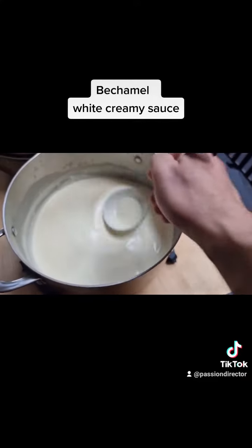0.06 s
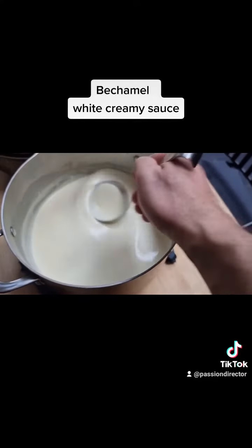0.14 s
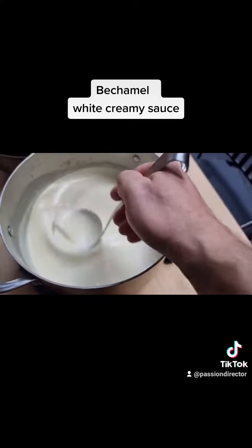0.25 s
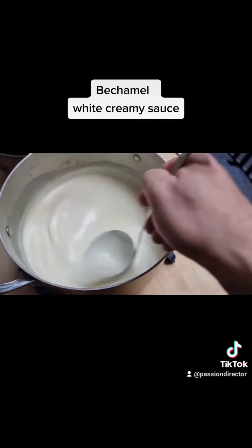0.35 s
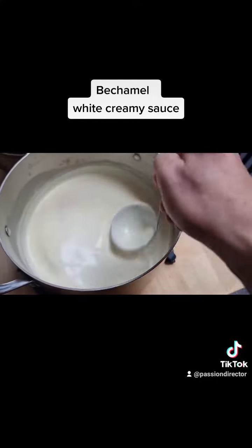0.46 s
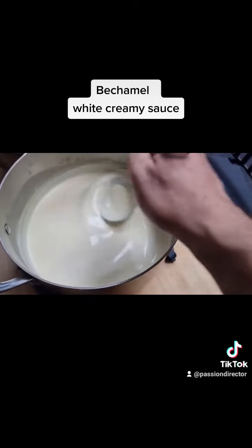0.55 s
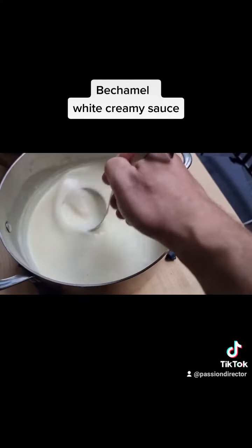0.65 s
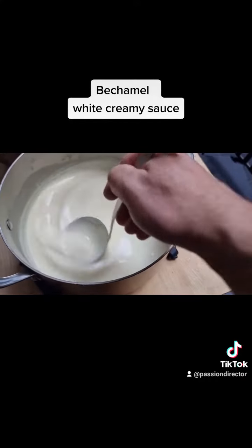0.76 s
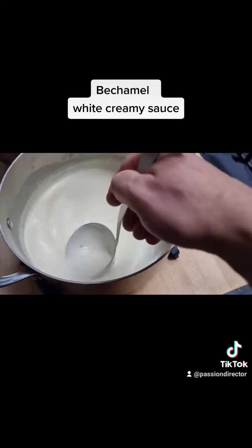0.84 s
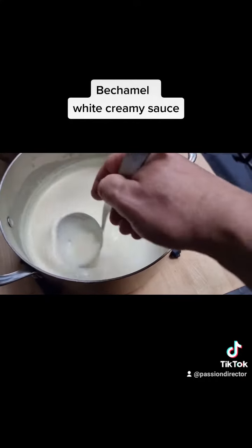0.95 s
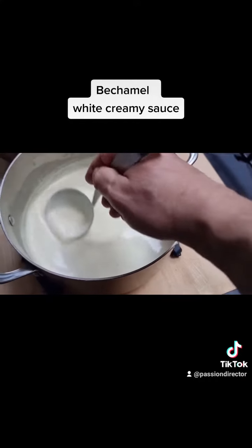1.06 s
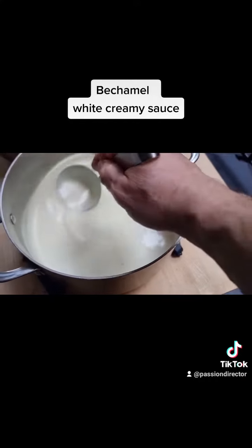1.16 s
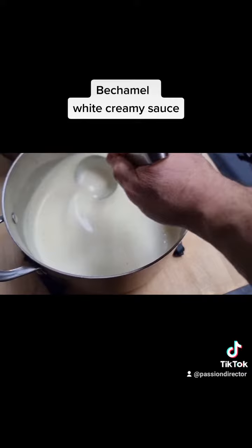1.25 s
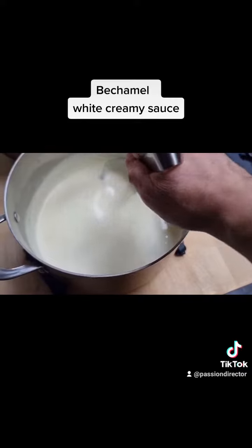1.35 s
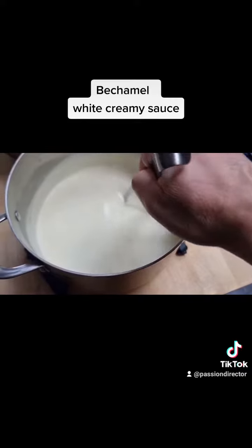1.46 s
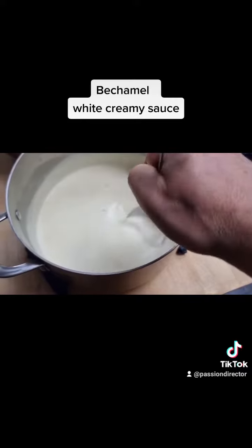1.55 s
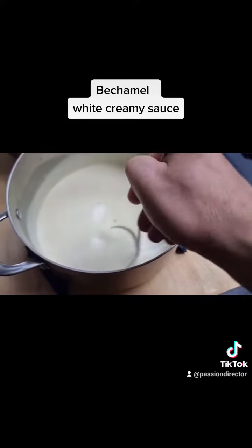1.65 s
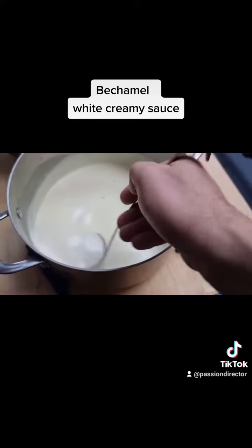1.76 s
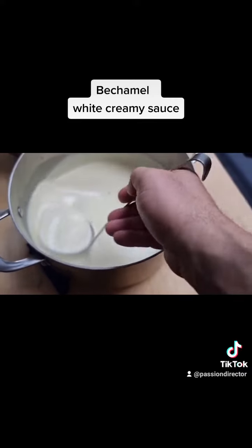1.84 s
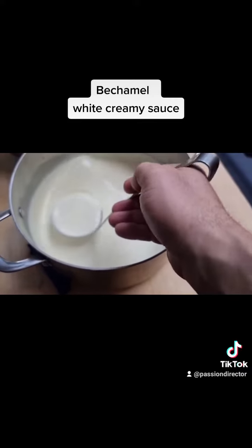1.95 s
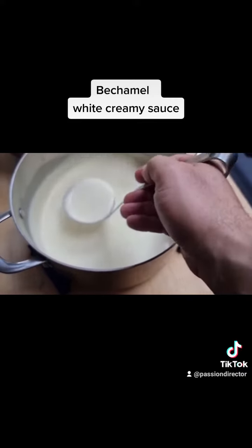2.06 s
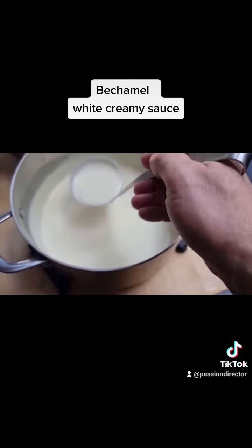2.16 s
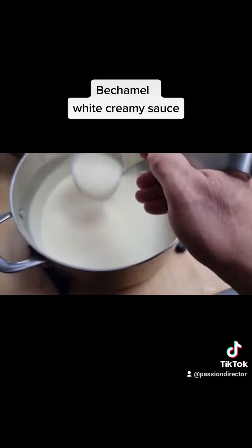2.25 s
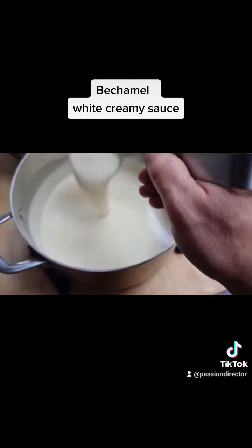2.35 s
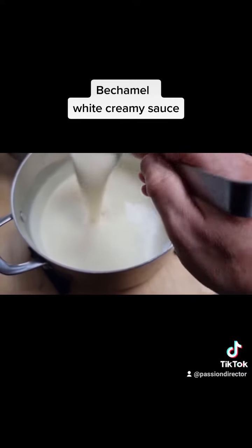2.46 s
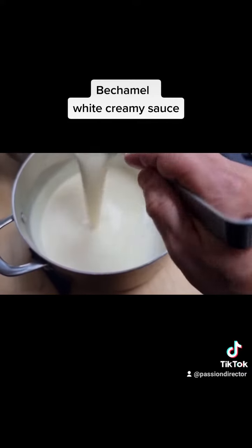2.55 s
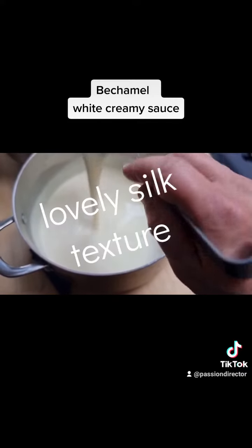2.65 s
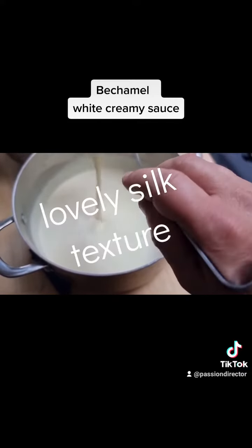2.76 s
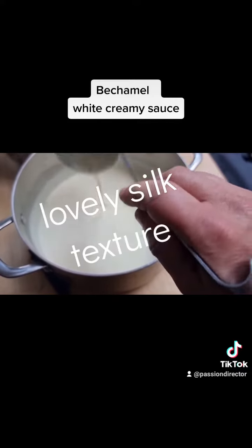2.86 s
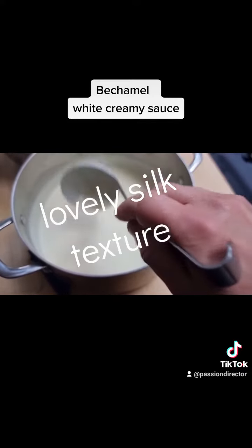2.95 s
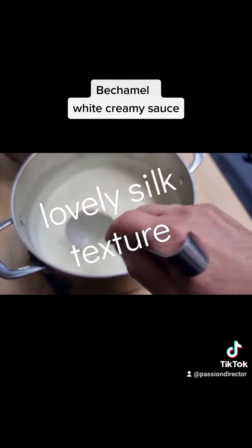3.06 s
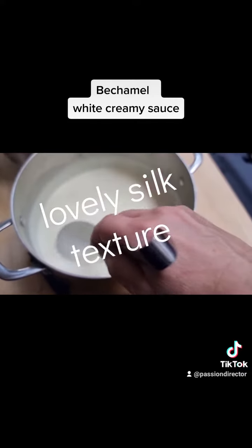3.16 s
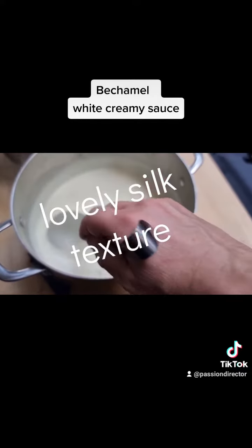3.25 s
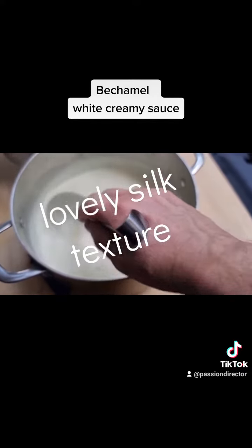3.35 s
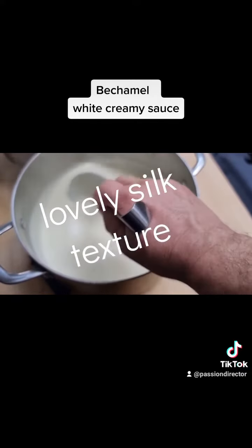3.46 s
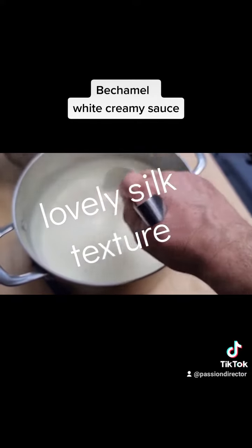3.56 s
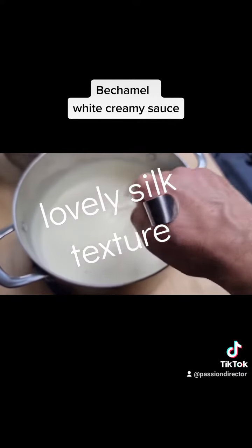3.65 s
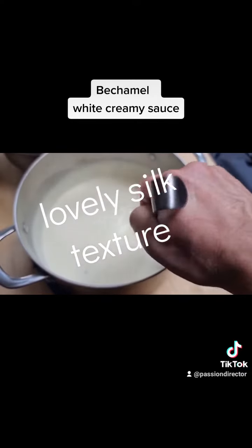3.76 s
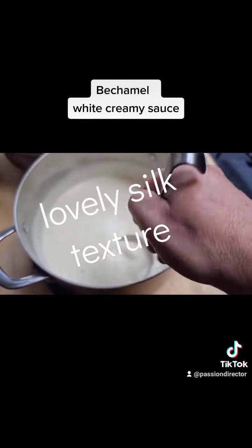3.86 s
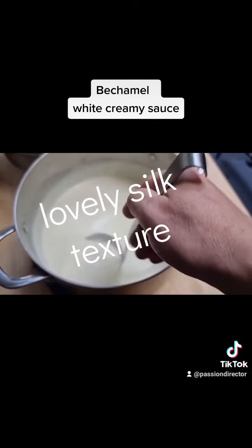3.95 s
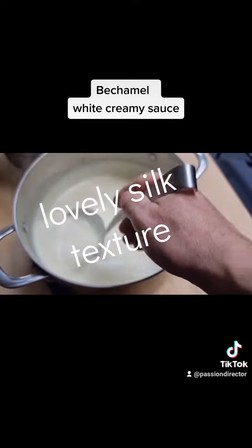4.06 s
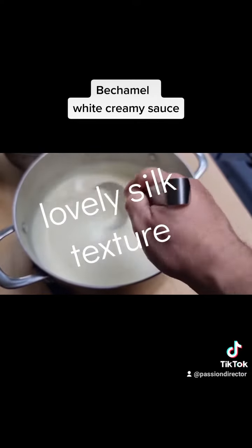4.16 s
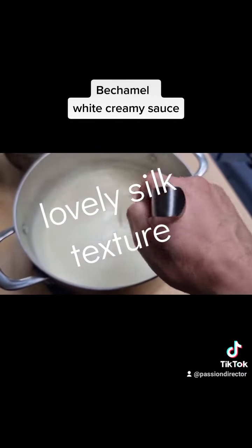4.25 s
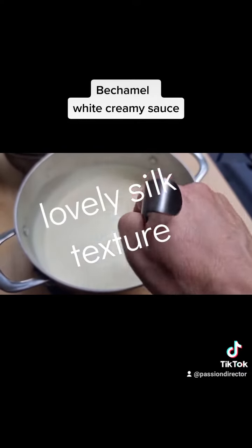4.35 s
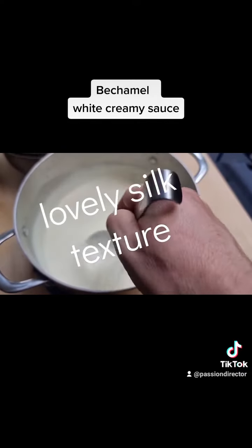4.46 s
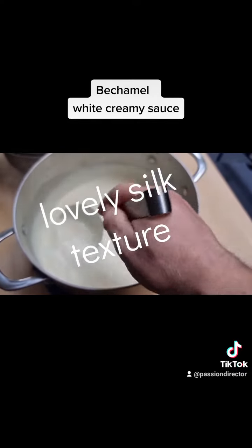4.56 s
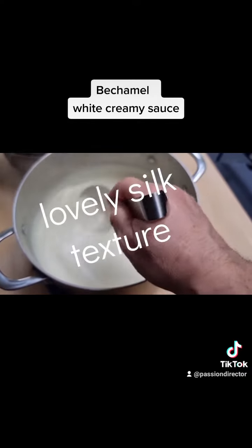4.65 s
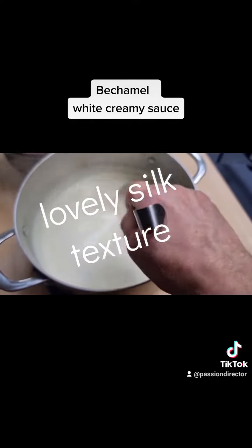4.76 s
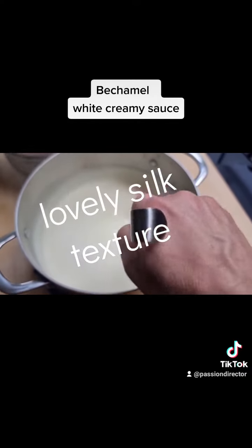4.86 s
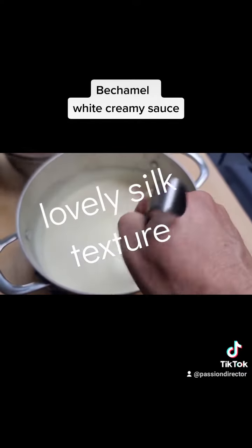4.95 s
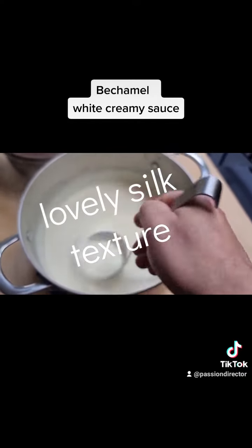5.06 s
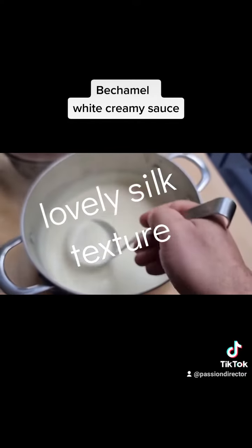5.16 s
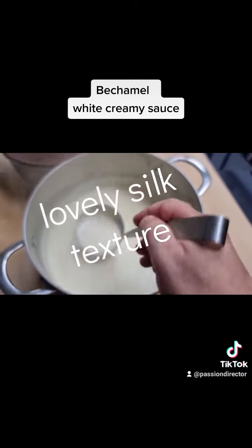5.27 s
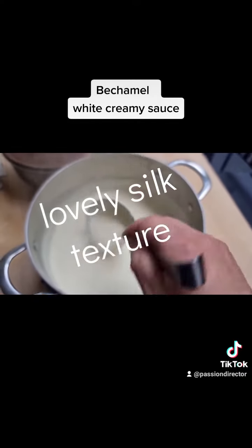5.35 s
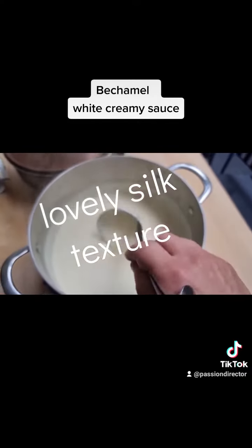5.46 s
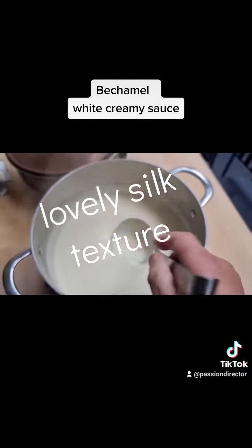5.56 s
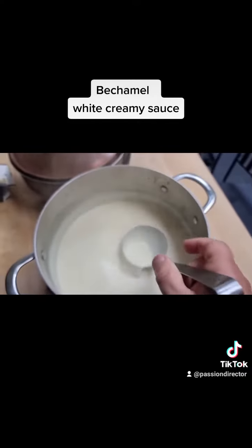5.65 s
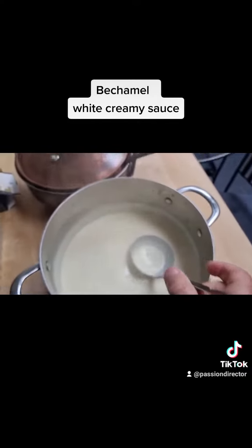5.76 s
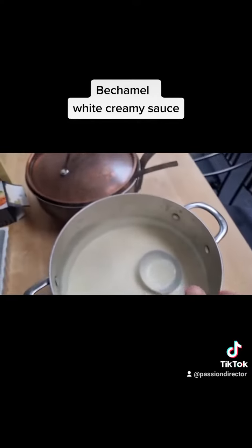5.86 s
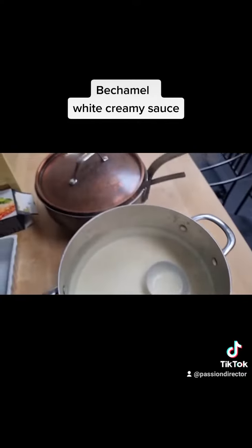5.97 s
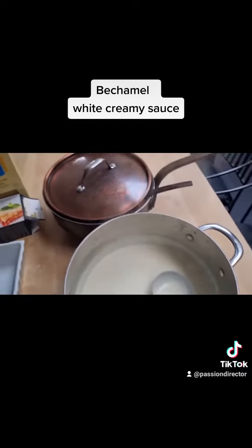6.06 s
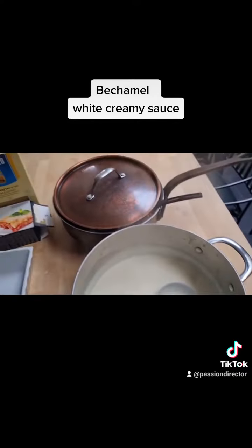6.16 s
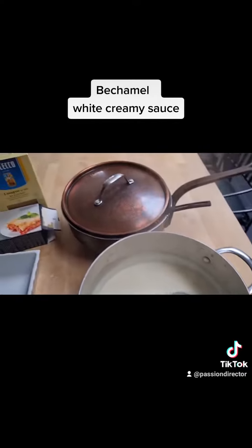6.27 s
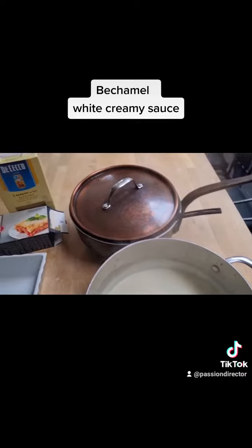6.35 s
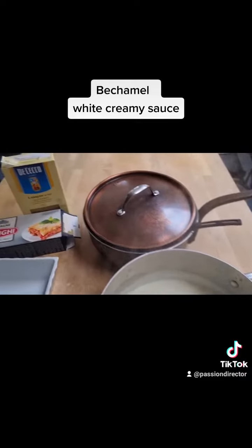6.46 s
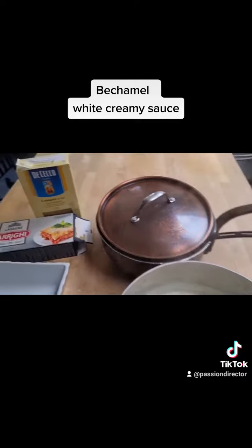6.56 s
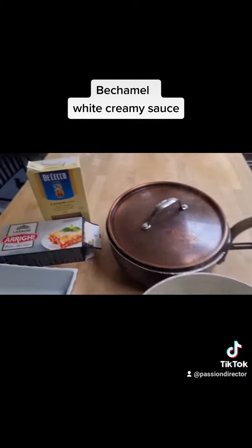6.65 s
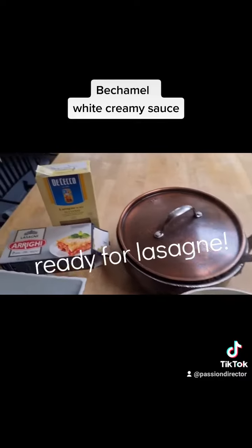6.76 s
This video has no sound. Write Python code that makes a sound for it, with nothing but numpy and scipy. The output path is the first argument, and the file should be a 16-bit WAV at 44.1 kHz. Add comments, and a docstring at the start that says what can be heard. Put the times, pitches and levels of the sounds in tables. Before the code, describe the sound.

A metal ladle scrapes unevenly around a steel pot of thick sauce in two spells, with small ticks and bumps. Between them, sauce plops quietly and the ladle knocks the bottom. Near the end it drops on the rim with a sharp clank, followed by a light rasping slide. The pot is close, in a kitchen with a brief echo and a faint fan and fridge hum.

```python
"""In a small kitchen, a steel ladle stirs thick sauce in a steel pot. Its bowl scrapes and bumps
the bottom, which sets the damped pot ringing. Ladle and sauce tick, and poured sauce plops.
The ladle knocks the bottom, then drops on the rim, and its handle rattles and slides along it.
The room echoes briefly, a fridge hums and a fan rushes far off."""
import sys
import numpy as np
from scipy import signal
from scipy.fft import rfft, irfft, next_fast_len
from scipy.io import wavfile
from scipy.ndimage import uniform_filter1d

SR = 44100
rng = np.random.default_rng(int(sys.argv[2]) if len(sys.argv) > 2 else 0)


def unload_wav(signal):
    """Save mono or channel-first audio to the path in sys.argv[1] as 16-bit WAV at rate SR, clipped to [-1, 1]."""
    wavfile.write(
        sys.argv[1],
        SR,
        np.round(np.clip(np.atleast_2d(signal).T, -1, 1) * 32767).astype(np.int16),
    )


N = 300321
TOP_HZ = 16000

# Two spells of stirring. Each row: time in seconds, level in dB, extra dB for the low tones,
# the low and the upper pitch in Hz that the ladle excites most, extra dB for the treble.
STIRRING = [
    [(0.0, -43, -0.5, 604, 1770, -30), (0.078, -49, -0.5, 540, 1020, -24.5),
     (0.164, -48.5, -6, 600, 950, -26.5), (0.38, -43, -1.5, 446, 1330, -23),
     (0.518, -50.5, -3, 675, 1710, -25), (0.624, -48.5, -3, 583, 1190, -22.5),
     (0.728, -38.5, -6.5, 590, 1250, -24.5), (0.946, -61.5, 1, 415, 1270, -39),
     (1.036, -47, -2.5, 616, 1150, -36), (1.084, -47, -5, 650, 1610, -28.5),
     (1.38, -56, -9.5, 443, 1030, -22.5), (1.545, -49.5, -6.5, 517, 1040, -27),
     (1.56, -45, 0, 490, 1110, -56), (1.688, -45, -1.5, 625, 1120, -36), (1.724, -43.5, -1, 426, 1170, -27),
     (1.782, -57, -3, 560, 1150, -16.5), (1.9, -71, 3, 375, 1180, -30)],
    [(3.3, -60, -21, 518, 2400, -27.5), (3.408, -52, -8, 580, 2350, -21.5),
     (3.47, -48.5, -13, 559, 2310, -25.5), (3.582, -48, -38, 439, 2000, -18.5),
     (3.664, -52, -15, 540, 1310, -23), (3.778, -48.5, -3, 610, 1020, -29),
     (3.98, -42.5, -1, 410, 1200, -36.5), (4.22, -49, -5.5, 570, 1480, -16),
     (4.356, -50, -2, 467, 1060, -27), (4.598, -45.5, -4.5, 604, 1230, -29),
     (4.76, -47, -13.5, 544, 1630, -8), (4.876, -51, -19, 577, 1740, -23),
     (4.922, -51, -1.5, 504, 1050, -26), (5.082, -55, -3, 452, 1350, -27),
     (5.15, -73, -4, 401, 1145, -63.5)],
]
def stirring():
    """The ladle's bowl drags unevenly over the bottom: the pot rings and the steel hisses."""
    (level_db, low_db, low_hz, upper_hz, treble_db), active = curves(STIRRING)
    catches = amp(2.5 * np.array([wobble(40) for _ in range(4)]))
    *pushes, rubbing = amp(level_db) * active * catches  # one push for each group of pot tones
    return pot(pushes, low_db, low_hz, upper_hz) + scrape_hiss(rubbing, treble_db)


# The tones of the full pot. Each row: pitch in Hz, seconds to fade by 60 dB, group (0 low,
# 1 middle, 2 high), then level in dB when scraped, struck on the bottom and struck on the rim.
POT_TONES = [(282.5, 0.069, 0, 1, -28.5, -8.5), (308.8, 0.13, 0, 6.5, -10, -6),
             (382, 0.079, 0, 0.5, -23.5, -15), (484, 0.24, 0, 1.5, -31.5, -41.5),
             (526.6, 0.2, 0, -2, -32.5, -9), (581, 0.44, 0, -6.5, -15, -27), (658, 0.22, 0, 6, -39, 5.5),
             (736.4, 0.24, 0, 3.5, -31, -30.5), (895, 0.16, 1, -3, -17, -4), (1024, 0.14, 1, -8, 0.5, -1.5),
             (1066.4, 0.076, 1, -1.5, -23.5, 16), (1119, 0.091, 1, 1, -15, -34.5),
             (1197, 0.18, 1, -9, -1.5, -13), (1360, 0.061, 1, -3, 3.5, -17.5),
             (1530, 0.13, 2, -8.5, 6.5, -7), (1634, 0.1, 2, -2, -8.5, -8), (1850, 0.08, 2, 3.5, -17.5, 2),
             (2030, 0.079, 2, -1, 12, 1), (2170, 0.13, 2, -9.5, -2, -21), (2332, 0.033, 2, 3, -10, -20.5),
             (2704, 0.076, 2, -5, -11.5, -23)]
# Extra dB for the low, middle and high group when scraped.
GROUP_DB = [-5, -5, -8.5]
def pot(pushes, low_db, low_hz, upper_hz):
    """Scraping, bumps and blows all ring the same tones; the pressing ladle damps and detunes them."""
    out = np.zeros((2, N))
    end = round((STIRRING[-1][-1][0] + .25) * SR)
    for hz, t60, group, scraped_db, bottom_db, rim_db in POT_TONES:
        group = round(group)
        tone_db = scraped_db + GROUP_DB[group] + contact_db(hz, group, low_db, low_hz, upper_hz)
        pressure = amp(tone_db + 2.04 * wobble(7)) * pushes[group]
        scrape = steady(.6 * t60) * pressure[:end] * friction(rough_db=5.5, rate=140, size=end)
        phase = -rng.uniform(.5, 1.8) * min(hz / 700, 1)
        out[:, :end] += ring(bumps(hz, end), hz, .5 * t60, phase)
        out[:, :end] += ring(scrape, hz, .44 * t60, phase, drift_hz=.01 * hz * wobble(4, end))
        out += blows(hz, t60, bottom_db, rim_db)
    # A small pot gives off no bass, and the sauce softens the treble.
    return signal.sosfilt(signal.butter(4, [250, 3500], "band", fs=SR, output="sos"), out)


def contact_db(hz, group, low_db, low_hz, upper_hz):
    """Where the bowl touches decides which tones it excites: those farther off in pitch get less."""
    if group == 0:
        return low_db - 24 * np.abs(np.log(hz / low_hz))
    upper_db = 10 * np.log10(np.clip(1 - amp(2 * low_db), .08, 1))  # what the low tones leave
    off_octave = np.abs(np.log(hz / (2.015 * upper_hz))) + .15  # tones an octave up answer too
    away = np.minimum(np.abs(np.log(hz / upper_hz)), off_octave)
    return upper_db + 5 * np.exp(-(away / .099) ** 2) - 14.5 * away


# Light bumps on the bottom. Each row: start in seconds, level in dB, pitch in Hz that rings most.
BUMPS = [(0.028, -30, 682), (0.076, -29.5, 473), (0.11, -34, 1884), (0.293, -24, 1100), (0.357, -23.5, 471),
         (0.399, -36, 480), (0.72, -31, 652), (1.554, -35, 520), (1.644, -28.5, 386), (1.676, -35, 661),
         (1.705, -22, 391), (2.987, -20, 1041), (3.589, -34, 1860), (3.839, -37, 1070), (3.964, -28, 384.4),
         (4.1, -39.5, 657), (4.575, -24, 639)]
def bumps(hz, size, contact_s=.0051):
    """The pushes that bumps give one pot tone; the sauce cushions each into a smooth pulse."""
    contact = np.hanning(round(contact_s * SR) + 3)
    push = contact / contact.sum() * np.exp(2j * np.pi * hz * np.arange(len(contact)) / SR)
    force = np.zeros(size, complex)
    for start, db, main_hz in BUMPS:
        force[round(start * SR):][:len(push)] = push * amp(db - 510 * abs(np.log(hz / main_hz)))
    return force


# Blows of the ladle. Each row: start in seconds, pot level in dB, place (0 bottom, 1 rim),
# handle level in dB, click level in dB, how many dB louder the left side is.
BLOWS = [(3.1698, -26, 0.068, -49, -1, 3.5), (5.580, -22, 0.92, -40, 2.5, -1.5),
         (5.599, -27.5, 0.8, -55.5, -12.5, 6), (6.093, -63.5, 1, -40.5, -19.5, 4)]
def blows(hz, t60, bottom_db, rim_db):
    """One pot tone after each blow: it starts louder and drops fast while the ladle still touches."""
    out = np.zeros((2, N))
    t = np.arange(SR // 2) / SR
    shape = (1 + amp(-.5 - 60 * t / .03)) * (1 - np.exp(-t / .0009))
    for start, db, place, _, _, left_db in BLOWS:
        first = round(start * SR)
        size = min(len(t), N - first)
        force = np.zeros(size)
        force[0] = amp(db + bottom_db + place * (rim_db - bottom_db))
        damped_t60 = (.28 + .6 * place) * t60  # on the bottom the ladle stays down and damps the ring
        phase = np.sign(left_db) * rng.uniform(.8, 1.9) * min(hz / 900, 1)  # the louder side leads
        tone = ring(force, hz, damped_t60, phase, drift_hz=.0062 * hz * wobble(38, size))
        out[:, first:first + size] += tone * shape[:size] * pan(left_db)
    return out


# The gritty and the bright part of the scraping hiss. Each row: frequency in Hz, level in dB.
GRITTY_HISS = [(1470, -55), (2500, -5.5), (4000, -8.5), (7110, -14.5), (8500, -26), (11000, -34),
               (18700, -120)]
BRIGHT_HISS = [(6500, 4.5), (8000, 7.5), (11000, 1), (15000, -1)]
def scrape_hiss(rubbing, treble_db):
    """Steel rubbing on steel hisses, and the scraped ladle sings at the tones of its handle."""
    def ladle_gain(f):
        peaks = sum(amp(4 + db) / (1 + ((f - hz) / 45) ** 2) for hz, _, db in HANDLE_TONES)
        return amp(along(GRITTY_HISS, f)) * (1 + peaks)

    hiss = np.array([friction(rough_db=3.5, rate=350), friction(rough_db=3, rate=67)])
    gritty_db = -13 + .3 * (treble_db + 21)  # partly follows the treble
    gritty = amp(gritty_db) * patchy(filtered(hiss, ladle_gain), depth_db=5)
    bright = amp(treble_db) * patchy(coloured(hiss, BRIGHT_HISS), depth_db=1.5)
    return rubbing * (gritty + bright)


# The handle's tones, in clusters of three. Each row: pitch in Hz, seconds to fade by 60 dB, level in dB.
HANDLE_TONES = [(1110, 0.07, 1.5), (1770, 0.06, 0.5), (2190, 0.05, -3.5), (3337, 0.088, 1.5),
                (3760, 0.034, 0.5), (4135, 0.053, 0), (4450, 0.068, -7), (4792, .06, -7),
                (5767, 0.051, -10), (6910, 0.047, -4.5), (7420, 0.026, -11)]
# Slides on the rim. Each row: start and length in seconds, ringing level in dB, rustle level in dB.
SLIDES = [(6.021, 0.077, -78.5, -63.5), (6.251, .04, -84, -54), (6.624, 0.54, -56, -61)]
# The dry rustle of a slide. Each row: frequency in Hz, level in dB.
RUSTLE = [(710, -46.5), (1200, -2), (1750, -3), (7330, -8), (14700, -18.5)]
def handle(rattle_t60=.33, low_delay_s=.07):
    """The handle rings and rattles when struck, and rasps and rustles as it slides on the rim."""
    slides = np.array([swell(start, length, rise=274, fall=165) for start, length, _, _ in SLIDES])
    rasp, rustle = amp(np.transpose(SLIDES)[2:]) @ slides
    late_rasp = np.pad(rasp, (round(low_delay_s * SR), 0))[:N]  # low tones take up a slide late
    hits = [(round(start * SR), db) for start, _, _, db, _, _ in BLOWS]
    rattle = np.zeros(N)
    for at, hit_db in hits:
        rattle[at:] += amp(hit_db - 1.5 - 60 * np.arange(N - at) / SR / rattle_t60)
    out = rustle * unit(coloured(rng.standard_normal((2, N)), RUSTLE))
    first = hits[0][0]  # no ringing before the first blow
    size, tap = N - first, np.array([.25, .5, .25])
    for hz, t60, db in HANDLE_TONES:
        shaking = (rattle + (late_rasp if hz < 2500 else rasp))[first:]
        for detune in (.985, 1, 1.025):
            pressure = amp(db - 11 + 2.9 * wobble(25, size)) * shaking
            force = steady(t60) * pressure * friction(rough_db=5.5, rate=430, size=size)
            for at, hit_db in hits:
                force[at - first:][:3] += amp(db + hit_db + rng.normal(0, 2.2)) * tap
            phase = rng.choice([-1, 1]) * rng.uniform(1, 1.7)
            out[:, first:] += ring(force, detune * hz, t60, phase, drift_hz=.006 * hz * wobble(30, size))
    return filtered(out, lambda hz: 1 / (1 + (800 / (hz + 1)) ** 4))  # too thin to give off bass


# The click of steel meeting steel. Each row: frequency in Hz, level in dB.
CLICK = [(200, -51), (400, -26), (900, 3), (1850, 8), (2850, -4), (5000, -15), (7000, -14), (10400, -23.5),
         (15000, -26.5), (16300, -59)]
def clicks():
    """Each blow and bump begins with a sharp click; sauce on the bottom dulls a blow's click."""
    out = np.zeros((2, N))
    for start, _, place, _, db, left_db in BLOWS:
        cushion = np.clip(.53 * (1 - place), 0, .9)
        click = signal.lfilter([1 - cushion], [1, -cushion], puff(db, t60=.014))
        add(out, start, click * pan(left_db))
    for start, db, _ in BUMPS:
        add(out, start, puff(db - 9.5, t60=.021))
    return coloured(out, CLICK)


# Thin ticks. Each row: start in seconds, level in dB, rough pitch in Hz.
TICKS = [(0.434, -31.5, 5870), (1.19, -37.5, 4560), (1.353, -38.5, 2400), (1.579, -37, 2500),
         (1.645, -35, 2900), (1.68, -33, 2700), (1.707, -36, 2700), (2.518, -33.5, 2840),
         (2.663, -50, 11580), (2.704, -45, 4130), (2.987, -40.5, 9600), (3.102, -52.5, 9500),
         (4.232, -39, 7800), (4.332, -40, 4800), (4.956, -35, 2490), (5.074, -51, 5900)]
def ticks():
    """Thin, short ticks from the ladle touching the pot and from the moving sauce."""
    out = np.zeros((2, N))
    for start, db, hz in TICKS:
        band = signal.butter(2, [.58 * hz, min(1.2 * hz, TOP_HZ)], "band", fs=SR)
        add(out, start, signal.lfilter(*band, puff(db, t60=.026)))
    return out


def sauce_plop():
    """Thick sauce lands with a low, lumpy plop."""
    spectrum = [(30, -27), (60, -6), (250, -8), (600, -21), (1000, -86)]
    lumps = unit(coloured(friction(rough_db=2, rate=25), spectrum))
    return amp(-45) * swell(start=2.35, length=0, rise=430, fall=180) * lumps


def table_thud(hz=62, t60=.23):
    """The table top thuds just after the ladle drops on the rim."""
    t = np.maximum(np.arange(N) / SR - BLOWS[1][0] - .025, 0)
    return amp(-39.5 - 60 * t / t60) * np.sin(2 * np.pi * hz * t) * (1 - np.exp(-t / .021))


# The room's echo. Each row: frequency in Hz, seconds to fade by 60 dB.
ECHO_TIMES = [(200, 0.48), (1000, 0.36), (4000, 0.34), (12000, 0.28)]
def kitchen_echo(x):
    """The walls answer a moment later, and each frequency dies away at its own speed."""
    hz, t, noise = signal.stft(rng.standard_normal((2, SR // 2)), SR, nperseg=256)
    fade = amp(-60 * t / along(ECHO_TIMES, hz)[:, None])
    tail = signal.istft(noise * fade, SR, nperseg=256)[1]
    delayed = np.pad(x, ((0, 0), (250, 0)))
    return signal.fftconvolve(delayed, tail / np.linalg.norm(tail[0]), axes=1)[:, :N]


# The fan's rush. Each row: frequency in Hz, level in dB.
FAN_RUSH = [(12, -54), (25, -38), (60, -10), (100, -9), (370, -12.5), (1000, -20.5), (2000, -26),
            (3500, -39), (6000, -52), (16000, -49.5)]
# Each row: frequency in Hz, how alike left and right are (1 the same, -1 opposite).
FAN_LIKENESS = [(60, 0.99), (180, 0.76), (550, -0.3), (15000, -0.94)]
def fan():
    """A far fan moves air with an even rush; its bass is alike on both sides."""
    def gains(hz):
        angle = np.arccos(np.clip(along(FAN_LIKENESS, hz), -1, 1)) / 2
        return amp(along(FAN_RUSH, hz)) * [np.cos(angle), np.sin(angle)]

    shared, opposite = filtered(rng.standard_normal((2, N)), gains)
    return amp(-56.5) * unit(np.array([shared + opposite, shared - opposite]))


# The fridge's tones. Each row: pitch in Hz, width of the noise around it in Hz, level in dB.
FRIDGE_TONES = [(63.3, 8, -77), (99.2, 7, -66.5), (198.9, 13, -60), (804, 10, -76.5)]
def fridge():
    """The fridge hums with slightly unsteady tones, each in a narrow band of noise."""
    out = np.zeros(N)
    for hz, width, db in FRIDGE_TONES:
        noise = unit(filtered(rng.standard_normal(N), lambda f: 1 / (1 + ((f - hz) / width) ** 2)))
        tone = np.sin(2 * np.pi * hz * np.arange(N) / SR + .16 * wobble(.37))
        out += amp(db) * (.46 * noise + 1.33 * tone)
    return out


def ring(force, hz, t60, phase, drift_hz=None):
    """A pushed tone that fades 60 dB in t60 seconds; left leads right by phase radians."""
    tone = signal.lfilter([1], [1, -amp(-60 / (t60 * SR)) * np.exp(2j * np.pi * hz / SR)], force)
    if drift_hz is not None:
        tone = tone * np.exp(2j * np.pi * np.cumsum(drift_hz) / SR)
    return np.imag([tone * np.exp(.5j * phase), tone * np.exp(-.5j * phase)])


def steady(t60):
    """The gain that keeps a noise-driven tone equally loud however long it rings."""
    return np.sqrt(2 * (1 - amp(-120 / (t60 * SR))))


def friction(rough_db, rate, size=N):
    """A rubbing force: noise in short, uneven catches."""
    return unit(rng.standard_normal(size) * amp(rough_db * wobble(rate, size)))


def puff(db, t60, rise_s=.00036):
    """A short, dying puff of noise on each side."""
    t = np.arange(SR // 20) / SR
    fade = amp(-60 * t / t60) * (1 - np.exp(-t / rise_s))
    noise = fade * rng.standard_normal((2, len(fade)))
    return amp(db) * noise * np.linalg.norm(fade) / np.linalg.norm(noise, axis=1, keepdims=True)


def patchy(x, depth_db):
    """x with random louder and softer patches over time and frequency."""
    spectra = signal.stft(x, nperseg=512)[2]
    patches = uniform_filter1d(rng.standard_normal(spectra.shape[1:]), size=3, axis=0)
    patches = unit(uniform_filter1d(patches, size=8, axis=1))
    return unit(signal.istft(spectra * amp(depth_db * patches), nperseg=512)[1][:, :N])


def curves(spells):
    """Each column after the time as a curve, and whether a spell is under way."""
    t = np.arange(N) / SR
    times, *columns = np.transpose(np.vstack(spells))
    active = np.any([(t >= rows[0][0]) & (t <= rows[-1][0]) for rows in spells], axis=0)
    return [np.interp(t, times, column) for column in columns], active


def swell(start, length, rise, fall):
    """A gain that climbs until start, holds for length and dies; rise and fall are in dB a second."""
    t = np.arange(N) / SR
    return amp(-rise * np.maximum(start - t, 0) - fall * np.maximum(t - start - length, 0))


def wobble(rate, size=N):
    """A random curve with rate new values a second."""
    knots = rng.standard_normal(int(size * rate / SR) + 2)
    return np.interp(np.arange(size) * rate / SR, np.arange(len(knots)), knots)


def filtered(x, gain):
    """x with each frequency scaled by gain(hz)."""
    size = next_fast_len(N + SR // 4)
    return irfft(rfft(x, size) * gain(np.fft.rfftfreq(size, 1 / SR)), size)[..., :N]


def coloured(x, spectrum):
    """x shaped by rows of frequency in Hz and level in dB."""
    return filtered(x, lambda hz: amp(along(spectrum, hz)))


def along(points, hz):
    """The value at hz between (Hz, value) points, on a log scale of frequency."""
    freqs, values = np.transpose(points)
    return np.interp(np.log(hz + 1), np.log(freqs + 1), values)


def amp(db):
    """Turns dB into a gain."""
    return 10 ** (np.asarray(db) / 20)


def unit(x):
    """x scaled to an average (rms) level of 1."""
    return x / np.sqrt(np.mean(x ** 2) + 1e-20)


def pan(left_db):
    """Two gains that put the left side left_db above the right."""
    return amp([[left_db / 2], [-left_db / 2]])


def add(out, start, sound):
    """Mixes sound into out at start seconds."""
    out[:, round(start * SR):][:, :sound.shape[1]] += sound


def scene():
    """The pot close by, its echo in the kitchen, and the fan and fridge behind."""
    near = stirring() + handle() + clicks() + ticks() + sauce_plop() + table_thud()
    return near * pan(1.4) + amp(-10.5) * kitchen_echo(near) + (fan() + fridge()) * pan(1.6)


def record(dry):
    """Cuts everything above TOP_HZ."""
    return filtered(dry, lambda hz: hz < TOP_HZ)


dry = scene()
out = record(dry)
unload_wav(out)
```